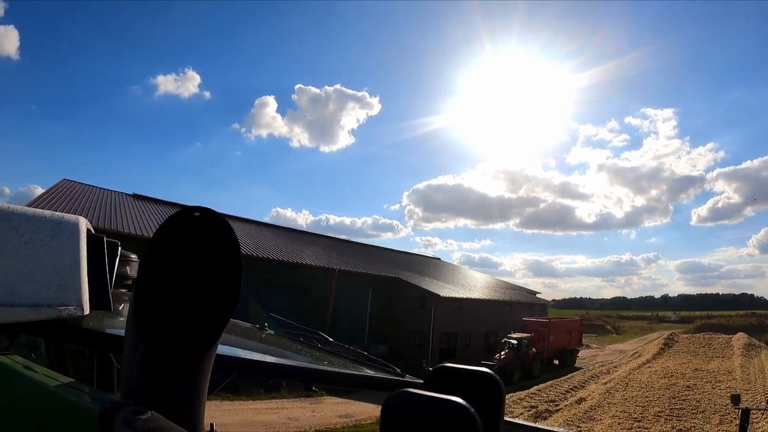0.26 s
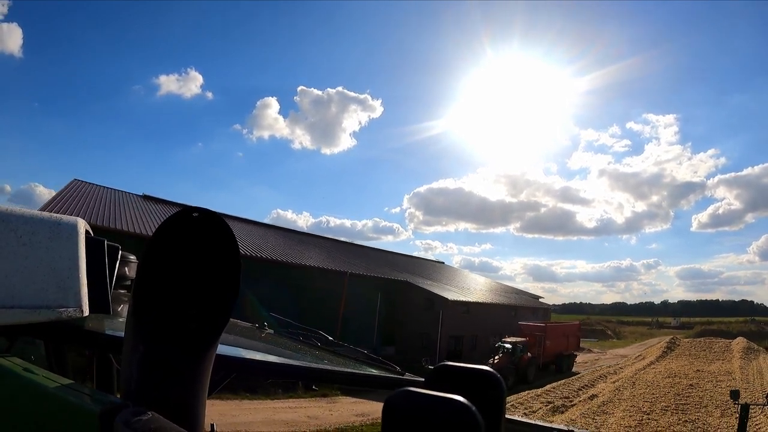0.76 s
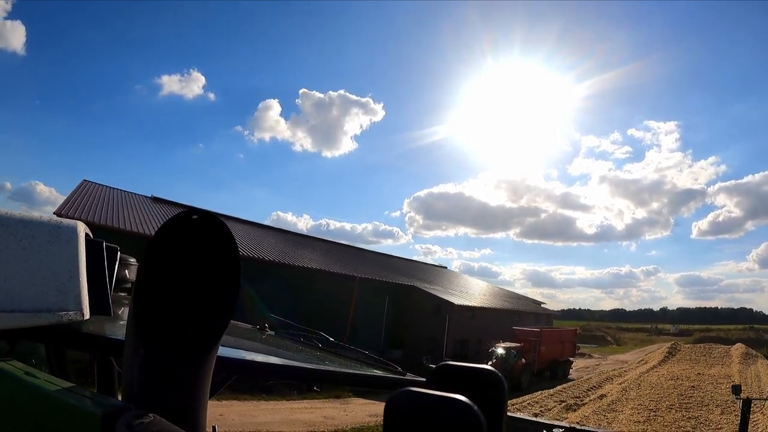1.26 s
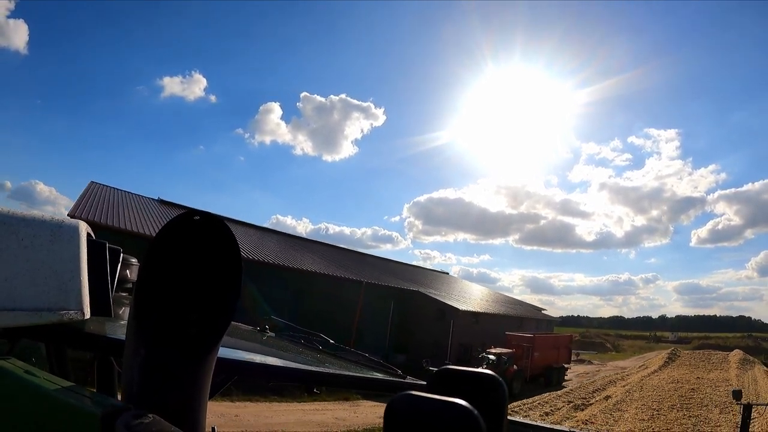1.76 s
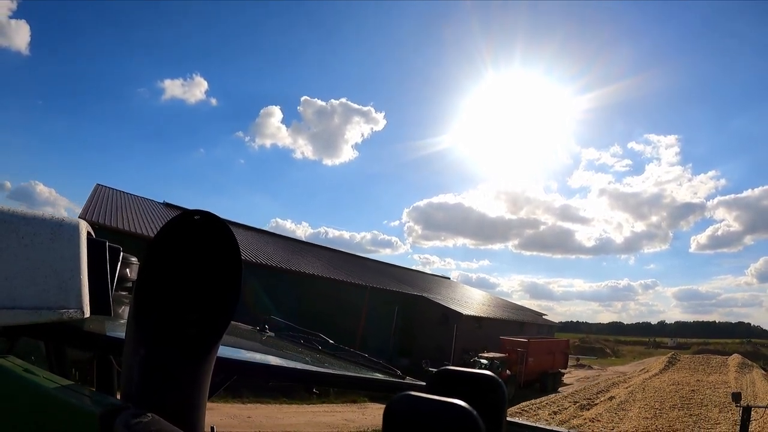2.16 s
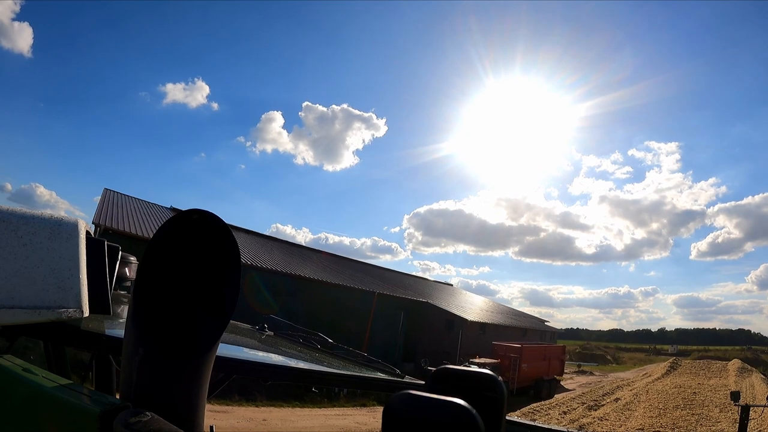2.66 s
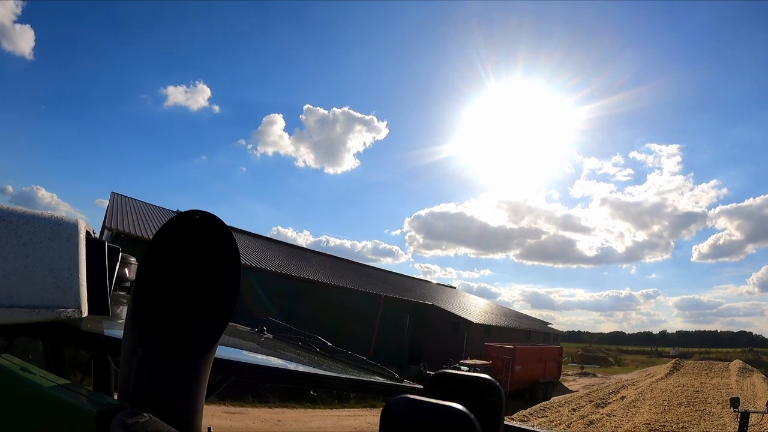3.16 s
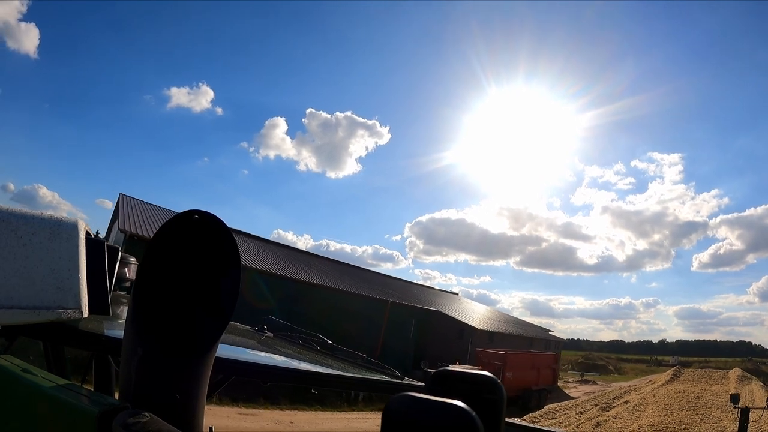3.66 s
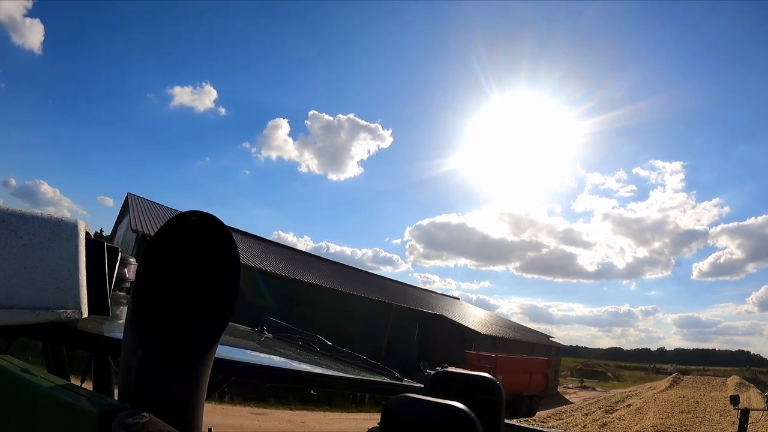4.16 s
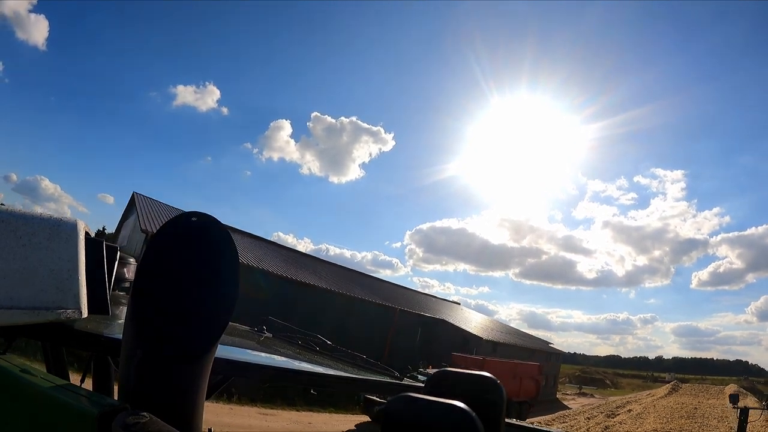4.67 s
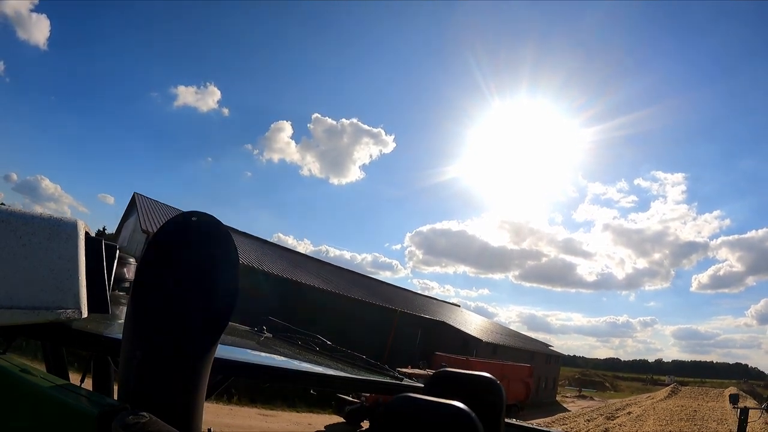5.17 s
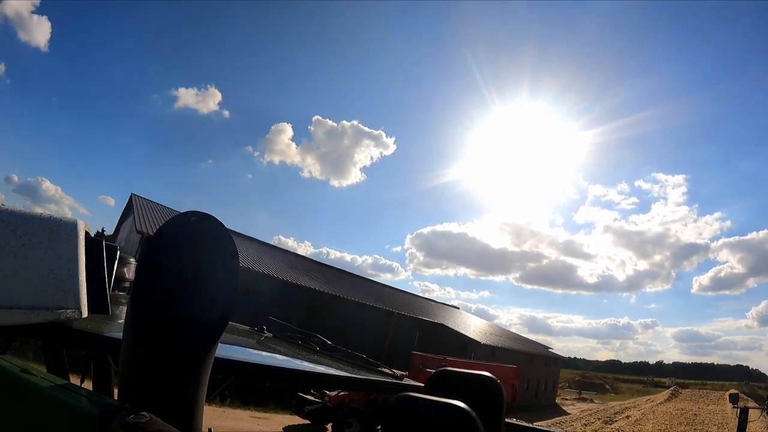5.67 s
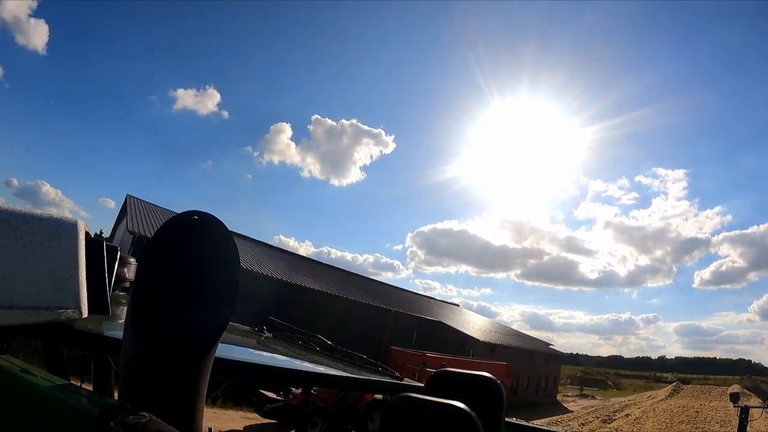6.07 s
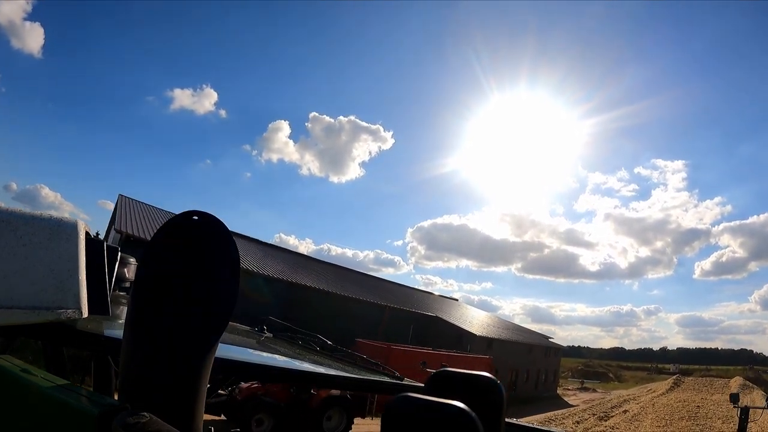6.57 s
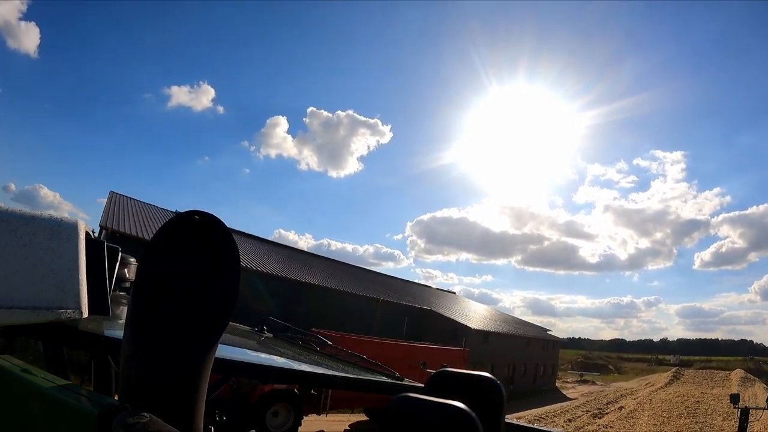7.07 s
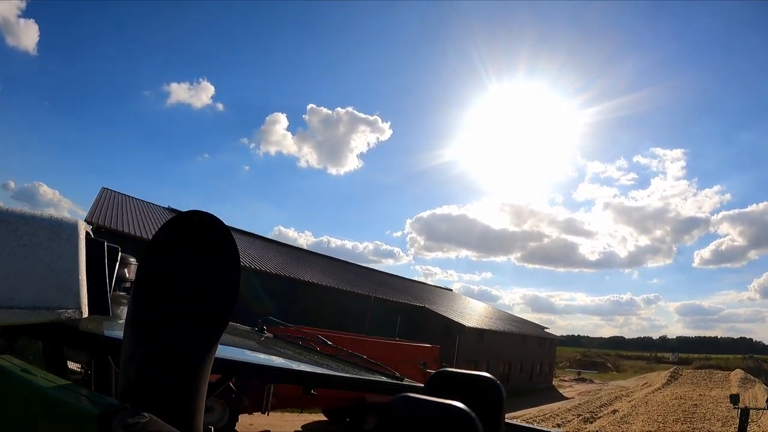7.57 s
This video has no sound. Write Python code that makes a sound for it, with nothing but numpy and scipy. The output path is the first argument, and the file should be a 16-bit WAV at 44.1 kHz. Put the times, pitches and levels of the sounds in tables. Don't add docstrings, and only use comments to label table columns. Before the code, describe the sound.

A tractor's six-cylinder diesel drones close by, its revs sagging unevenly to a low chug, then pulling back up under load as wind puffs the microphone.

```python
import sys
import numpy as np
from scipy import signal
from scipy.fft import rfft, irfft, next_fast_len
from scipy.io import wavfile
from scipy.ndimage import uniform_filter1d, map_coordinates

SR = 44100
rng = np.random.default_rng(int(sys.argv[2]) if len(sys.argv) > 2 else 0)


def nominal_scale(level):
    x = np.asarray(level, float) / 20
    return 10 ** x


def unload_wav(signal):
    wavfile.write(
        sys.argv[1],
        SR,
        np.round(np.clip(np.atleast_2d(signal).T, -1, 1) * 32767).astype(np.int16),
    )


N = 345303
T = np.arange(N) / SR
MIDDLE_HZ = 60


def unit(x):
    return x / np.sqrt(np.mean(x ** 2) + 1e-20)


def steady(x):
    return x / np.sqrt(np.abs(uniform_filter1d(x ** 2, size=6000)) + 1e-12)


def curve(points, lag_s=0):
    s, value = np.transpose(points)
    return np.interp(T - lag_s, s, value)


def along(points, hz):
    f, value = np.transpose(points)
    return np.interp(np.log(hz + 1), np.log(f + 1), value)


def wobble(rate):
    coarse = np.arange(0, N + 64, 64)
    knots = rng.standard_normal(int(N * rate / SR) + 4)
    return np.interp(np.arange(N), coarse, map_coordinates(knots, [coarse * rate / SR]))


def filtered(x, response):
    m = next_fast_len(N + 8192)
    return irfft(rfft(x, m) * response(np.fft.rfftfreq(m, 1 / SR)), m)[..., :N]


def coloured(x, spectrum):
    return filtered(x, lambda hz: nominal_scale(along(spectrum, hz)))


def ringing(x, modes):
    def response(f):
        total = 0
        for k, (centre, width, db) in enumerate(modes):
            damping = 1j * f * width
            total = total + (-1) ** k * nominal_scale(db) * damping / (centre * centre - f * f + damping)
        return total
    return filtered(x, response)


# (time [s], firing rate [Hz])
FIRING_RATE = [(0.0, 80.71), (0.7, 82.06), (1.51, 67.9), (2.02, 66.43), (2.49, 55.86), (2.86, 55.42),
               (3.1, 65.38), (3.37, 54.66), (3.57, 50.12), (4.09, 31.92), (4.4, 49.38), (4.63, 37.98),
               (4.88, 46.42), (5.56, 56.85), (5.83, 55.7), (6.35, 65.42), (7.07, 72.45), (7.83, 75.43)]


def crankshaft():
    flywheel_s, first_firing = .1, -.16
    hz = uniform_filter1d(curve(FIRING_RATE), size=round(flywheel_s * SR))
    return np.cumsum(hz) / SR + first_firing, hz


# (time [s], level under full load [dB])
EFFORT = [(0, -7.5), (.5, -10.5), (1.2, -12), (2.1, -18.5), (2.74, -14), (3.0, -5.5), (3.1, -1.5),
          (3.18, -21), (4.08, -16.5), (4.23, 0), (4.44, -2), (4.49, -22.5), (4.62, -14), (4.72, -1),
          (5.5, 0.74), (6.5, 0.5), (7.1, -5), (7.83, -9)]


def layer_level(hz, full_db, per_load, per_octave, lag_s=0):
    return full_db + per_load * curve(EFFORT, lag_s) + per_octave * np.log2(hz / MIDDLE_HZ)


# (time [s], length [s], depth [dB], recovery [s])
GOVERNOR_CUTS = [
    (2.195, .345, -9.5, .07),
    (3.18, .075, -15, .02),
    (3.37, .65, -10.5, .025),
    (4.48, .1, -13, .015),
]


def fuel_cut(slower):
    shut_s = .025
    lost_db = np.zeros(N)
    for start, length, depth_db, recovery in GOVERNOR_CUTS:
        shutting = np.clip((T - start) / shut_s, 0, 1)
        returning = np.exp(-np.clip(T - start - length, 0, None) / (recovery * slower))
        lost_db += depth_db * shutting * returning
    return lost_db


CYLINDER_STRENGTH = [0, -1, .6, -.6, 1, -.8]


def bursts(firings, hz, late, t60, scatter_db, bed, rise):
    count = firings - late
    which = np.floor(count).astype(int) + 1
    size_db = np.take(CYLINDER_STRENGTH, which % 6) + scatter_db * rng.standard_normal(2000)[which]
    since = count % 1 / hz
    shape = nominal_scale(size_db - 60 * since / t60) * (1 - np.exp(-since / rise)) ** 2
    return (unit(shape) + bed) * rng.standard_normal(N)


def exhaust(firings, hz):
    pipe_lag_s = .015
    load_db = layer_level(hz, 0, 1, 0, pipe_lag_s)
    early = .115 * np.minimum(nominal_scale(load_db), 1) * MIDDLE_HZ / hz
    boom_db = layer_level(hz, -20.9, 0.9, 1.1, pipe_lag_s) + .44 * fuel_cut(1) + .7 * wobble(16)
    return firing_orders(firings, hz, load_db, early) + nominal_scale(boom_db) * stack_puffs(firings, hz, early)


# (frequency [Hz], level [dB])
PIPE_RESPONSE = [(33, -24), (42, -17.5), (63, -13.5), (74, -15.7), (82, -13.5), (112, -20.5), (140, -14),
                 (166, -18.5)]
# (frequency [Hz], level [dB])
THIRD_ORDER = [(105, -30), (125, -28), (145, -19), (170, -29), (200, -31), (222, -23), (245, -26.5)]
# (order [firing rate], level over the mean of the low orders [dB])
UPPER_ORDERS = [(4, -10), (5, -15), (6, -19), (7, -23), (8, -27)]
# (order [firing rate], level over the mean of the first two [dB])
UNEVEN_ORDERS = [(0.5, -31), (1.499, -22.5), (1.833, -34.5), (2.5, -28.5), (3.501, -23), (4.5, -25.5),
                 (5.5, -22)]
EARLY_BY_ORDER = [.4, .5, 1]


def firing_orders(firings, hz, load_db, early):
    bass_hz = 55
    shut_db = fuel_cut(1)
    turn = 2 * np.pi * (firings + 0.012 * wobble(14))

    def uneven(lost_db, swing_db):
        hunting = 1 + .2 * wobble(13)
        return lost_db * hunting + swing_db * wobble(12)

    def wave(order, db):
        f = order * hz
        lead = np.arctan2(f * bass_hz, f * f - bass_hz ** 2)
        forward = 2 * np.pi * early * np.interp(order, [1, 2, 3], EARLY_BY_ORDER)
        return np.sqrt(2) * nominal_scale(db) * np.cos(order * (turn + forward) + lead)

    first_db = along(PIPE_RESPONSE, hz) + uneven(fuel_cut(2.2), .6)
    second_db = along(PIPE_RESPONSE, 2 * hz) - 5 - .22 * load_db + uneven(.85 * shut_db, 1)
    third_db = along(THIRD_ORDER, 3 * hz) + .25 * load_db + uneven(.5 * shut_db, 2)
    mean_db = (first_db + second_db) / 2

    clean = wave(1, first_db) + wave(2, second_db) + wave(3, third_db)
    for order, db in UPPER_ORDERS:
        clean += wave(order, (third_db + mean_db) / 2 + db - 3.5 + 2.5 * wobble(20))
    for order, db in UNEVEN_ORDERS:
        clean += wave(order, mean_db + db + 2 + 0.44 * load_db + 2.9 * wobble(5.3))
    return clean


MANIFOLD_PUFFS = [1.45, .55, 1.25, .5, 1.5, .7]
# (frequency [Hz], width [Hz], level [dB])
STACK_MODES = [(222, 40, -11), (297, 45, 0), (430, 130, -14)]
# (frequency [Hz], level [dB])
STACK_MOUTH = [(150, -2.5), (240, 1.5), (330, -3.5), (520, -1), (900, -30), (3000, -65)]


def stack_puffs(firings, hz, early):
    stack_hz = 297
    count = np.floor(firings + early + hz / stack_hz).astype(int)
    kicks = np.diff(count, prepend=0) * np.take(MANIFOLD_PUFFS, count % 6) * nominal_scale(2 * wobble(45))
    ragged = bursts(firings, hz, late=-.3, t60=.05, scatter_db=1.2, bed=.7, rise=.0012)
    lines = unit(ringing(kicks, [(stack_hz, 48, 0)]))
    smear = unit(ringing(ragged, STACK_MODES))
    return steady(coloured(lines + .95 * smear, STACK_MOUTH))


# (frequency [Hz], width [Hz], level [dB])
BLOCK_MODES = [(1704, 53, -1.5), (2315, 400, -6.5), (2574, 73, 2.5), (2902, 215, -3), (4340, 380, -6),
               (6780, 480, -21)]
# (frequency [Hz], width [Hz], level [dB])
COVER_MODE = [(3090, 180, 0)]
# (frequency [Hz], width [Hz], level [dB])
THUD_MODES = [(928, 134, 0.5), (1112, 217, -1.5), (586, 42, -6.5)]
# (frequency [Hz], density [dB per Hz])
CRACK_SPECTRUM = [(7600, -60), (8400, -12), (10200, -0.5), (11500, -6), (13000, -11), (14600, -28.5),
                  (15500, -120)]
# (frequency [Hz], level [dB])
TREBLE_SLOPE = [(1000, 0), (7700, 0), (8400, -22), (12000, -34)]


def knock(firings, hz):
    def blow(t60, bed, late=-.25):
        return bursts(firings, hz, late, t60, scatter_db=2.2, bed=bed, rise=.0012)

    block = steady(ringing(blow(t60=0.027, bed=0.056), BLOCK_MODES))
    cover = steady(ringing(blow(t60=0.028, bed=0.12), COVER_MODE))
    sing = np.clip((hz - 42) / 30, .1, .6)
    ring = np.sqrt(1 - sing) * block + np.sqrt(sing) * cover
    thud = steady(ringing(blow(t60=0.028, bed=0.35, late=-.42), THUD_MODES))
    crack = steady(coloured(blow(t60=0.056, bed=.3), CRACK_SPECTRUM))

    ring_db = layer_level(hz, -29.5, 1, 0)
    thud_db = layer_level(hz, -29.5, 0.59, 2.5)
    crack_db = layer_level(hz, -60, 0.53, 3)
    return coloured(nominal_scale(ring_db) * ring + nominal_scale(thud_db) * thud, TREBLE_SLOPE) + nominal_scale(crack_db) * crack


# (frequency [Hz], density [dB per Hz])
GEAR_SPECTRUM = [(710, -38), (1200, -0.5), (1590, -1), (2000, -5), (2100, -3.5), (2620, -2), (2870, -5),
                 (3310, -9), (3850, -11), (4400, -17.5), (4830, -5.5), (5520, -15), (7870, -24),
                 (10200, -36), (17300, -120)]
# (frequency [Hz], width [Hz], level [dB])
TAPPET_MODES = [(3980, 240, -1), (4760, 240, -1)]


def valve_gear(firings, hz):
    taps = bursts(firings, hz, late=-.33, t60=0.029, scatter_db=6.0, bed=3.7, rise=0.0012)
    clatter = unit(coloured(taps, GEAR_SPECTRUM))
    tappets = unit(coloured(ringing(taps, TAPPET_MODES), TREBLE_SLOPE))
    ticks = clatter + 0.33 * nominal_scale(-.35 * fuel_cut(1)) * tappets
    tick_db = layer_level(hz, -35, 0.19, 4.7) - 4.5 * wind_guard()
    return nominal_scale(tick_db) * ticks


# (frequency [Hz], density [dB per Hz])
FAN_SPECTRUM = [(15, -34.5), (25, -8.5), (86, -4), (260, -9), (351, -19), (400, -11.5), (482, -14.5),
                (702, -19), (929, -20.5), (1540, -24.5), (2200, -33.5), (2860, -61), (4840, -120)]


def fan(hz):
    air = unit(coloured(rng.standard_normal(N), FAN_SPECTRUM)) * nominal_scale(.8 * wobble(25))
    return nominal_scale(layer_level(hz, -25, 0.17, 4)) * air


# (frequency [Hz], side minus mid [dB])
SIDE_WIDTH = [(40, -25.5), (100, -46.5), (180, -35), (300, -33), (510, -17.5), (870, -16), (1500, -13.5),
              (2500, -11), (4300, -14.5), (7400, -8.5)]
# (frequency [Hz], left minus right [dB])
PORT_LEAN = [(300, -.4), (500, 0), (900, 1), (1500, 1), (2500, 2), (4300, 2), (7400, 3.5), (12000, 1)]


def off_the_bonnet(mid):
    z = signal.stft(mid, nperseg=1024)[2]
    random_phase = np.exp(2j * np.pi * rng.random(z.shape))
    scattered = signal.istft(z * random_phase, nperseg=1024)[1][:N]
    side = coloured(scattered, SIDE_WIDTH) * nominal_scale(3)
    pair = np.array([mid + side, mid - side])
    return filtered(pair, lambda f: nominal_scale(along(PORT_LEAN, f) * [[.5], [-.5]]))


# (time [s], level [dB])
WIND_PUFFS = [(3.032, -32), (4.33, -38), (4.427, -39), (4.496, -42), (4.604, -38), (4.862, -28),
              (5.0, -36), (5.076, -22), (5.223, -36), (5.266, -38), (5.336, -17.5), (5.473, -19),
              (5.568, -28), (5.626, -24), (5.687, -31), (5.73, -40), (5.772, -28),
              (6.54, -37),
    (6.62, -44),
    (6.842, -17),
    (7.225, -22),
    (7.29, -30),
]
# (time [s], level [dB])
BREEZE_LEVEL = [(0, -64), (4.2, -46), (4.5, -33), (4.8, -56), (5.05, -37), (5.6, -27.5), (6.2, -38.5),
                (7.83, -43)]
# (frequency [Hz], density [dB per Hz])
BUFFET_SPECTRUM = [(18, -34), (30, -4), (170, 7), (780, -3), (1000, -8), (1550, -20.5), (3000, -40.5),
                   (9000, -53.5), (15000, -72.5)]


def wind():
    strength = nominal_scale(curve(BREEZE_LEVEL) + 4 * wobble(30))
    for s, db in WIND_PUFFS:
        strength += nominal_scale(db + 4.0) * np.exp(-np.abs(T - s) / 0.0096)
    turbulence = unit(coloured(rng.standard_normal((2, N)), BUFFET_SPECTRUM))
    return strength * [[.3], [1]] * turbulence


def wind_guard():
    start_s, rise_s = 5.4, 0.33
    return np.clip((T - start_s) / rise_s, 0, 1)


def scene():
    firings, hz = crankshaft()
    engine = exhaust(firings, hz) + knock(firings, hz) + valve_gear(firings, hz) + fan(hz)
    return off_the_bonnet(engine) + wind()


def roll_off(x):
    return signal.sosfilt(signal.butter(12, 14700, fs=SR, output="sos"), x)


# (time [s], side level [dB])
MONO_FOLD = [(0, 0), (5.5, -1), (5.7, -7), (5.9, -13), (6.3, -19), (6.7, -21), (6.85, -32), (7.83, -40)]
# (frequency [Hz], level [dB])
GUARD_TONE = [(500, -0.53), (1500, -4.4), (3000, 0.05), (6000, -4), (8000, -7), (9000, -12), (14000, -14)]


def record(dry):
    mid = (dry[0] + dry[1]) / 2
    side = (dry[0] - dry[1]) / 2 * nominal_scale(curve(MONO_FOLD))
    pair = np.array([mid + side, mid - side])
    pair = pair + wind_guard() * (coloured(pair, GUARD_TONE) - pair)
    held = pair / (1 + np.abs(pair / .95) ** 6) ** (1 / 6)
    return roll_off(held)


dry = scene()
out = record(dry)
unload_wav(out)
```